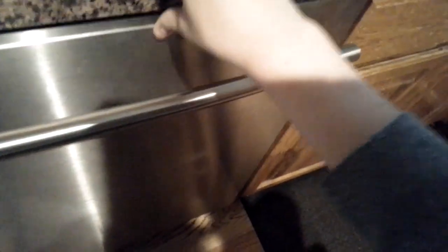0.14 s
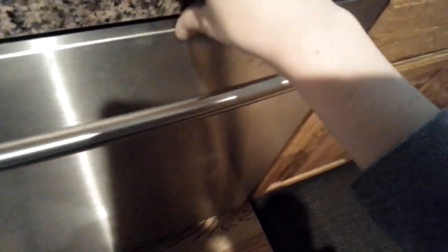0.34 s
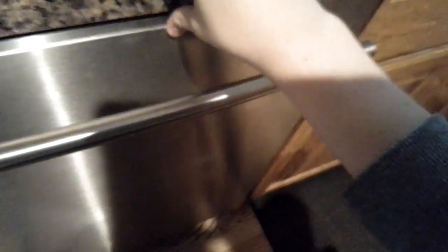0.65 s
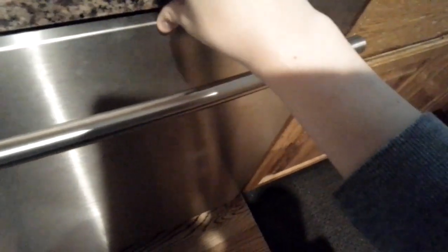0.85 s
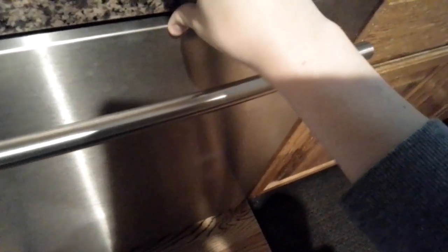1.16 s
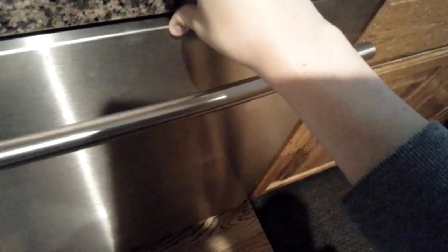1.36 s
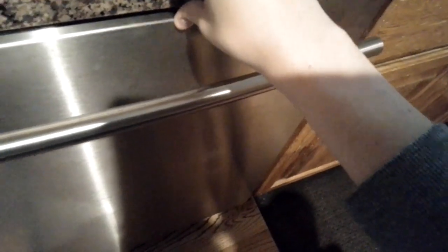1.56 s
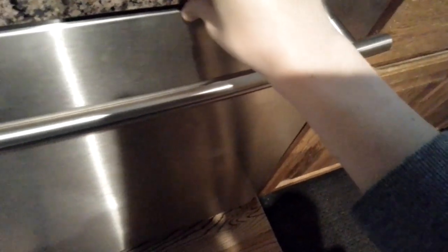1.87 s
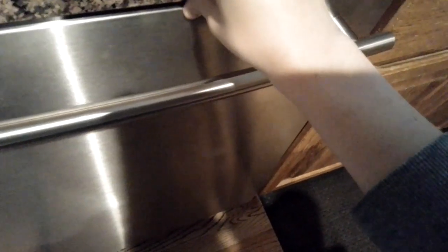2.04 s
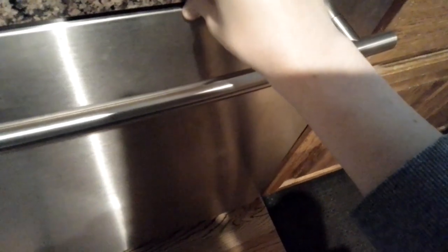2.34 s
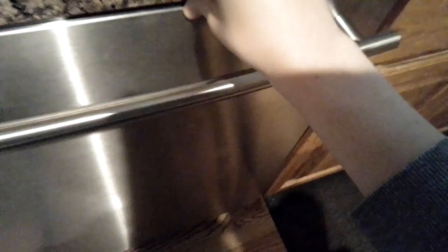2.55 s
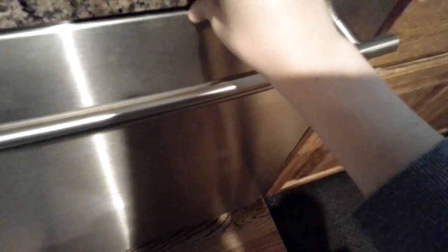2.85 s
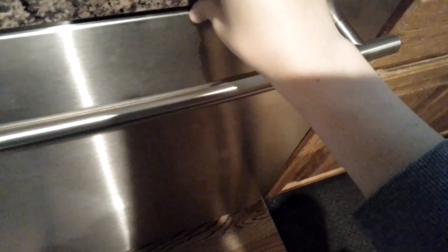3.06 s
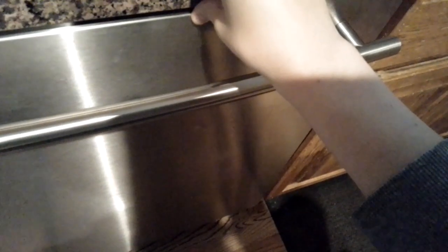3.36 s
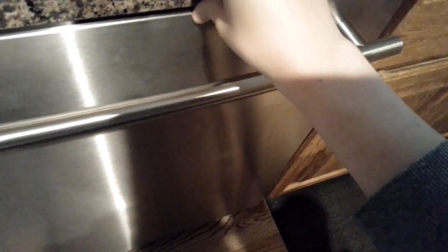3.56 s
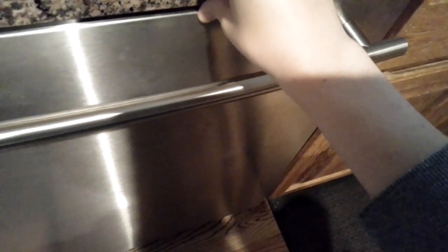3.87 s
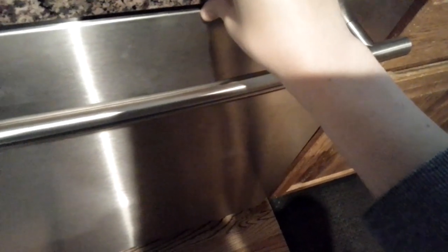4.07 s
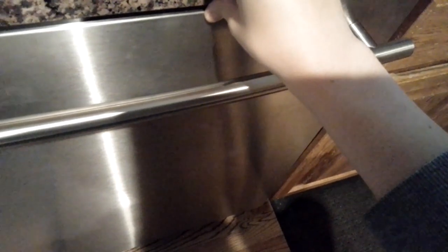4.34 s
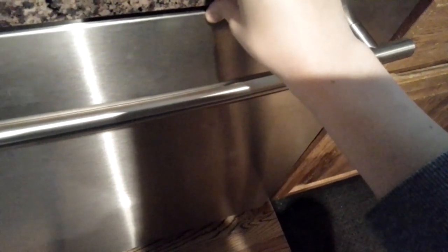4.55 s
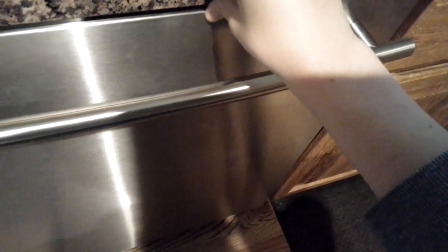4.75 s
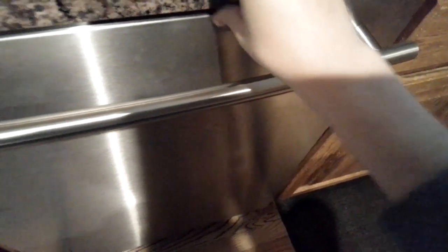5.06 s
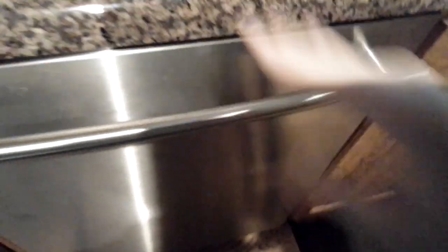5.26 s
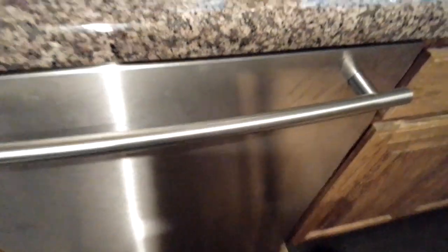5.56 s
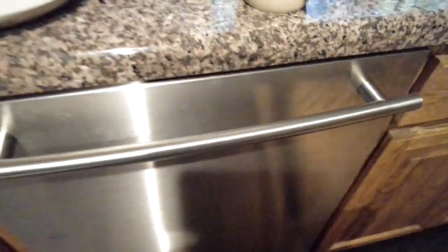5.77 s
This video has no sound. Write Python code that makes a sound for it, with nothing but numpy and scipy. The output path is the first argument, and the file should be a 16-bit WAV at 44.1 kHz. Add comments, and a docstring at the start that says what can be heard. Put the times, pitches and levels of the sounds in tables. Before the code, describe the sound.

Soft cloth rustles and dull door bumps, a loud latch thud with rattling racks, then a switch click, pump hum and splashing water inside a dishwasher.

```python
"""In a small kitchen, cloth brushes a steel dishwasher door and fingers tap it; it bumps softly on its gasket.
The latch snaps in and sets steel panel tones ringing, the cabinet booms in low tones and the racks rattle.
A switch clicks, then a relay starts the wash pump: rotor harmonics beat against the mains hum.
Water drums and splashes inside as shaped noise, ringing patter, bubbles and short slaps."""
import sys
import numpy as np
from scipy import signal
from scipy.fft import rfft, irfft, next_fast_len
from scipy.io import wavfile

SR = 44100
rng = np.random.default_rng(int(sys.argv[2]) if len(sys.argv) > 2 else 0)


def inscribe(sig):
    """Save sig as 16-bit PCM at rate SR to the path in sys.argv[1].

    A 1-D sig is mono; a 2-D sig holds one channel per row.
    Samples are clipped to [-1, 1] before scaling.
    """
    pcm = np.round(np.clip(np.atleast_2d(sig).T, -1, 1) * 32767)
    wavfile.write(sys.argv[1], SR, pcm.astype(np.int16))


N = 260631
TIME = np.arange(N) / SR   # seconds
AGE = TIME[:SR * 3 // 2]   # seconds since a blow

# Levels in the tables are relative: the functions below may scale them as a group.
# T60 is the time a sound takes to fall by 60 dB.

# The quiet of the room. Each row: frequency in Hz, density in dB per Hz.
ROOM_TONE = [(20, -8.5), (32, 5), (58, 4.5), (80, -1), (112, 6), (145, -8.5), (215, -1.5), (300, -10),
             (415, -6), (520, -14), (1000, -18), (2400, -22), (5800, -35.5), (7600, -47), (9500, -43.5),
             (11500, -57)]
# Echo of the kitchen. Each row: frequency in Hz, T60 in seconds.
KITCHEN_T60 = [(60, 0.24), (200, 0.93), (700, 0.51), (2000, 0.49), (5000, 0.53), (10000, 0.15)]
# How alike left and right are. Each row: frequency in Hz, likeness from -1 to 1.
LIKENESS = [(60, .95), (250, .98), (500, .92), (1000, .15), (2000, -.15), (4500, .2), (10000, -.4)]
# How the two microphone ports differ. Each row: frequency in Hz, left minus right in dB.
MIC_BALANCE = [(60, 0.07), (500, -2.5), (2000, -1.43), (3500, -2.5), (5500, -4.5), (7200, 4), (10000, 0.5)]
MIC_LOW_CUT_HZ, CUTOFF_HZ = 24, 10600

# Cloth brushes the door. Each row: start in seconds, length in seconds, level in dB.
BRUSHES = [(0.0, 0.16, -63), (0.13, 0.14, -63.5), (0.267, 0.096, -62), (0.328, 0.14, -66.5),
           (0.562, 0.24, -67)]
# Colour of the cloth. Each row: frequency in Hz, density in dB per Hz.
SLEEVE_COLOUR = [(150, 19), (400, 17.5), (1000, 11), (2500, 6.5), (4500, -2.5), (6500, -3), (8000, -16),
                 (9600, -5), (11000, -32)]
# The palm skids on steel. Each row: start in seconds, length in seconds, level in dB, pitch in Hz, width in Hz.
SCRAPES = [(0.0, 0.052, -73, 4200, 900), (0.16, 0.06, -82, 9400, 1300), (0.22, 0.077, -71, 4740, 1500),
           (0.273, .013, -72, 5400, 2800), (0.36, 0.06, -72.5, 3350, 700), (5.155, 0.0054, -59, 6940, 4000),
           (5.169, 0.0056, -60, 7000, 4000)]

# Fingers tap the door edge. Each row: start in seconds, level in dB.
TAPS = [(0.157, -3.5), (0.19, -12), (0.212, -9), (0.293, -2.5), (0.717, 6.5), (3.774, 0)]
# Tones of a tap. Each row: frequency in Hz, level in dB, T60 in seconds.
TAP_MODES = [(208.3, -42.5, 0.02), (470, -46, 0.015)]
# The held door creaks in faint slips. Each row: start in seconds, level in dB.
SLIPS = [(2.419, -62), (2.455, -68), (2.519, -60), (2.553, -63), (2.586, -70)]
SLIP_S = 0.015   # length of one slip
# Colour of the creak. Each row: frequency in Hz, density in dB per Hz.
CREAK_COLOUR = [(800, -20), (1800, -2.5), (2300, 2), (2900, -17), (5000, -19), (6200, -16), (7200, -27),
                (11000, -36)]

# The door meets its rubber gasket. Each row: start in seconds, level in dB.
BUMPS = [(0.295, -23.5), (0.706, -11), (0.881, -19), (1.139, -4.5), (1.4625, -1), (1.549, -11)]
# The door bounces on the rubber. Each row: frequency in Hz, level in dB, T60 in seconds.
GASKET_MODES = [(178, -22, .06), (206, -16.5, .075), (245, -22, .055), (300, -26, .05)]
# Colour of the dull knock. Each row: frequency in Hz, density in dB per Hz.
BUMP_KNOCK = [(70, -1.5), (110, 0), (200, 1), (330, -7.5), (460, -0.5), (580, -11.5), (750, -7.5),
              (950, -20), (1150, -12), (2500, -20)]
GASKET_SWELL_S = 0.0096   # the springy seal lets each bump swell

# Door contacts: the latch catches twice, then the door rebounds. Each row: start in seconds, level in dB,
# contact brightness (treble limit) in Hz.
DOOR_BLOWS = [(1.6316, 2, 9100), (1.6366, -15.5, 6870), (1.822, -13.5, 1250)]
# Tones of the door panel. Each row: frequency in Hz, level in dB, T60 in seconds.
DOOR_MODES = [(251, -31, .3), (318, -31, .25), (415, -34, .55), (456, -39, .3), (666, -28, .42),
              (705, -30, .2), (770, -29, .28), (812, -31, .33), (991, -35, .3), (1105, -28, .2),
              (1180, -25.5, .24), (1386, -30, .25), (1529, -32, .28), (1641, -30, .26), (1878, -29, .28),
              (2013, -29, .26), (2148, -29, .2), (2207, -29, .22), (2325, -30, .25), (2650, -33, .2),
              (3036, -33, .27), (4229, -35.5, .28), (4470, -36, .2), (4990, -39, .2)]
# Colour of the latch crack. Each row: frequency in Hz, density in dB per Hz.
DOOR_CRACK = [(70, -23), (140, -18), (290, -6), (380, -14), (500, -8), (700, 1.5), (920, -6), (1200, 0.5),
              (1500, -2), (2200, -2.5), (2800, -10), (3300, -16), (4600, -16), (6000, -22.5), (7200, -28),
              (10000, -27), (14000, -49)]

# The door's weight lands on the tub. Each row: start in seconds, level in dB.
THUDS = [(1.633, 0), (1.821, -12)]
# Tones of the tub. Each row: frequency in Hz, level in dB, T60 in seconds.
TUB_MODES = [(62, -35.5, 1.4), (110, -23, .22), (196, -10.3, 0.25), (279, -19, .17)]
# Colour of the boom. Each row: frequency in Hz, density in dB per Hz.
BOOM_COLOUR = [(25, -7), (45, 0), (100, 0.5), (220, 0), (330, -6.5), (500, -21.5), (1500, -60)]
BOOM_SWELL_S = 0.012
# The machine lurches on its feet. Each row: start in seconds, length in seconds, level in dB, pitch in Hz.
LURCHES = [(1.644, 0.054, -24, 48), (1.693, .06, -22.5, 65), (1.823, .07, -34.5, 72), (1.915, .06, -43, 70)]

# The racks crash when the latch catches, then chatter on until they settle.
RACKS_S, RACKS_ATTACK_S = 1.636, 0.009
CRASH_DB, CRASH_T60_S = -21, 0.055
CHATTER_DB, CHATTER_HOLD_S, CHATTER_T60_S = -39.5, 0.07, 0.38
RATTLES_PER_S, RATTLE_SPREAD_DB = 260, 3.5
# Racks knock against the tub. Each row: start in seconds, level in dB.
RACK_KNOCKS = [(1.6485, -18.5), (1.661, -26.5), (1.6877, -29.5), (1.703, -32.5), (1.722, -32), (1.745, -34),
               (1.78, -31)]
# Colour of the racks. Each row: frequency in Hz, density in dB per Hz.
RACK_COLOUR = [(200, -10), (420, -4), (700, -1), (1300, 0.5), (2700, 0.5), (3400, -7), (5800, -14),
               (7200, -32), (11000, -42)]
# Dishes and loose things, jolted by the door or hit by a jet, ring once.
# Each row: start in seconds, level in dB, pitch in Hz, width in Hz, T60 in seconds.
PINGS = [(1.78, -45, 5600, 850, .11), (2.119, -54, 1140, 240, .22), (5.061, -43.5, 3480, 300, .11),
         (5.061, -53, 5500, 500, .1), (5.385, -50, 3900, 300, .08), (5.628, -47, 3900, 300, .09),
         (5.628, -49, 5600, 500, .15)]
PING_ATTACK_S = 0.0016

# Clicks of the control switch. Each row: start in seconds, level in dB.
SWITCH = [(3.172, -46.5), (3.1755, -37), (3.180, -50), (3.186, -49), (3.205, -44.5)]
# Tones of the switch in the door. Each row: frequency in Hz, level in dB, T60 in seconds.
SWITCH_MODES = [(292, -12, .13), (315, -11, .18), (1150, -14, .035), (1682, -22, .2), (1997, -23, .22),
                (3278, -29, .2), (4355, -27, .22), (5421, -28, .2)]
# Colour of the switch. Each row: frequency in Hz, density in dB per Hz.
SWITCH_COLOUR = [(35, -10), (90, 7), (190, -5), (300, -4.5), (420, -4), (660, -2.5), (880, -13),
                 (1150, -3.5), (1400, -3), (2000, -2), (2600, -11.5), (3300, -8), (4300, -9), (4900, -13),
                 (5800, -12), (7400, -34), (10000, -31), (12000, -55)]
# Contacts of the pump relay. Each row: start in seconds, level in dB.
RELAY = [(4.5345, 0.5), (4.5405, -18)]
# Tones of the relay housing. Each row: frequency in Hz, level in dB, T60 in seconds.
RELAY_MODES = [(850, -28.5, 0.021), (1012, -23, 0.02), (1284, -37, 0.028), (2200, -44.5, 0.034)]
# Colour of the relay snap. Each row: frequency in Hz, density in dB per Hz.
RELAY_SNAP = [(200, -6), (550, -7), (800, 8), (1200, 6), (1600, 3), (2200, 7), (3000, -7.5), (5000, -4.5),
              (6500, 2.5), (7600, -14), (9800, -8), (11000, -52)]
RELAY_SWELL_S = 0.0019   # the housing takes a moment to ring up

# The rotor gathers speed and the hum grows with it.
PUMP_START_S, SPIN_UP_S, START_SLIP_HZ = 4.535, 0.0987, 14.25
MAINS_HZ, ROTOR_HZ = 60, 56.42   # rotor speed once it has spun up, before the wobble
THROB_S = 4.982   # a moment when rotor and mains swell together
# Mains hum. Each row: multiple of the mains frequency, level in dB.
MAINS_LINES = [(2, -46), (8, -58.5), (14, -63.5)]
# Rotor and vane hum. Each row: multiple of the rotor speed, level in dB.
ROTOR_LINES = [(2, -42.5), (6, -50), (7, -44.5), (8, -50), (9, -59), (12, -47)]
MOTOR_DB, MOTOR_RISE_S = 3.5, 0.22
ROTOR_DB, ROTOR_RISE_S, ROTOR_WAVER_DB = -3, 0.27, 2
WOBBLE_TURNS, WOBBLES_PER_S = 0.005, 12   # the uneven load shakes the rotor's speed
STRAIN_S, STRAIN_LENGTH_S, STRAIN_DB = 4.72, 0.18, 4.5   # the vanes sing out as they first bite the water
# The motor grinds into motion.
GROWL_DB, GROWL_HZ, GROWL_WIDTH_HZ, GROWL_T60_S = -52, 330, 200, 0.35
# The impeller gulps air. Each row: start in seconds, level in dB, T60 in seconds.
GULPS = [(4.625, -48, 0.15), (4.667, -41, 0.64)]
GULP_ATTACK_S, CHURN_DB = 0.0053, -55.5   # churning goes on once it is primed

# Water first churns in the sump and drums on the tub; the spray follows once the arms have filled.
WATER_START_S, PRESSURE_RISE_S = 4.59, 0.22
SPRAY_START_S, SPRAY_RISE_S = 4.61, 0.12
DRUMMING_DB, DRUMMING_GROWTH_DB_PER_S = -46, 4.5
SPRAY_DB, SPRAY_GROWTH_DB_PER_S = -50, 2.5
SLOSH_DB = 2.8   # how unevenly the water sloshes
# Colour of water drumming on the tub. Each row: frequency in Hz, density in dB per Hz.
DRUMMING = [(25, -4), (45, -8), (65, 14.5), (77, 5), (92, 8.5), (140, -1), (200, 5.5), (255, 2.5),
            (315, 3.5), (440, -2), (580, -3), (710, -9), (830, -19), (2000, -46.5)]
# Colour of the spray. Each row: frequency in Hz, density in dB per Hz.
HISS = [(450, -24.5), (750, -12.5), (1050, -1.5), (1500, -9.5), (1900, -8), (2300, -7), (2800, -13),
        (3500, -15.5), (4500, -19.5), (5700, -21.5), (7000, -30.5), (8000, -39), (9600, -36), (11000, -71)]
GURGLES_DB = -5.5   # air pockets against the spray
GURGLES_PER_S, GURGLE_SPREAD_DB = 70, 18
GURGLE_LOW_HZ, GURGLE_HIGH_HZ = 659, 2258   # range of starting pitches
GURGLE_CYCLES, GURGLE_RISE = 55, 0.12   # cycles at starting pitch to lose 60 dB; steepness of the upward glide
# Jets slap the door and dishes; the first two rows are spurts as the priming pump gulps air. Each row: start in
# seconds, level in dB, brightness (treble limit) in Hz.
SPLASHES = [(4.626, -38, 1300), (4.68, -37.5, 1710), (4.745, -35.5, 1500), (5.004, -49, 6000),
            (5.059, -30, 8740), (5.156, -40.5, 12000), (5.185, -35, 1400), (5.351, -39, 2000),
            (5.384, -34, 4950), (5.6275, -31, 9000), (5.777, -33, 1492), (5.838, -31.5, 1310),
            (5.885, -35.5, 4970)]
# Colour of a slap. Each row: frequency in Hz, density in dB per Hz.
SPLASH_COLOUR = [(300, 12.5), (1100, 13), (1900, 12.5), (2700, 0), (3500, 9), (4400, 2.5), (5700, 2),
                 (7000, -15.5), (10000, -15), (11500, -41)]
SLAP_ATTACK_S, SLAP_T60_S, SLAP_ROUGH_DB = 0.0018, 0.067, 1   # a jet crossing the door


def from_db(db):
    """Turn decibels into gain."""
    return 10 ** (np.asarray(db) / 20)


def rms_one(x):
    """Scale to an rms (average strength) of 1."""
    return x / np.sqrt(np.mean(x ** 2) + 1e-20)


def at_hz(points, hz):
    """Read a table between its rows on a log-frequency axis."""
    table = np.array(points)
    return np.interp(np.log(hz), np.log(table[:, 0]), table[:, 1])


def pan(x, left_db):
    """Lean a sound to the left by so many dB; negative leans right."""
    return x * from_db([[left_db / 2], [-left_db / 2]])


def drift(rate, size=N):
    """Wander around 0 with a spread of about 1, heading for a new random value `rate` times a second."""
    knots = rng.standard_normal(1024)
    return np.interp(TIME[:size] * rate, np.arange(len(knots)), knots)


def rise(start_s, rise_s):
    """Grow smoothly from silence to full strength."""
    return np.sin(np.pi / 2 * np.clip((TIME - start_s) / rise_s, 0, 1)) ** 2


def dying(t60):
    """Fade by 60 dB every t60 seconds."""
    return np.exp(-np.log(1000) * AGE / t60)


def burst(start_s, attack_s, t60, hold_s=0):
    """Attack, hold, then release exponentially."""
    release_s = np.maximum(TIME - start_s - attack_s - hold_s, 0)
    return rise(start_s, attack_s) * np.exp(-np.log(1000) * release_s / t60)


def stroke(start_s, length_s):
    """Make one movement that swells and fades."""
    return np.sin(np.pi * np.clip((TIME - start_s) / length_s, 0, 1))


def coloured(x, spectrum, power=1):
    """Shape a signal by a table of Hz and dB, with the gain raised to a power."""
    size = next_fast_len(x.shape[-1] + 4096)
    hz = np.maximum(np.arange(size // 2 + 1) * SR / size, 1)
    shaped = rfft(x, size) * from_db(power * at_hz(spectrum, hz))
    return irfft(shaped, size)[..., :x.shape[-1]]


def bands(size, focus=1):
    """Give stereo noise band by band; LIKENESS times focus sets how alike the two sides are."""
    edges = np.geomspace(20, 15000, 21)
    white = rng.standard_normal((2, 2, size + 8192))   # neighbouring bands use separate noise
    for k, (low, high) in enumerate(zip(edges, edges[1:])):
        band_filter = signal.butter(2, [low, high], "band", fs=SR, output="sos")
        mid, side = signal.sosfilt(band_filter, white[k % 2])[:, -size:]   # skip the filter's start-up
        hz = np.sqrt(low * high)
        alike = np.clip(focus * at_hz(LIKENESS, hz), -1, 1)
        yield hz, np.sqrt(1 + alike) * mid + np.sqrt(1 - alike) * side * [[1], [-1]]


def noise(spectrum, patchy_db=0, size=N, focus=1):
    """Make coloured stereo noise of rms 1 whose bands flicker separately by patchy_db."""
    flickering = sum(band * from_db(patchy_db * drift(25, size)) for hz, band in bands(size, focus))
    return rms_one(coloured(flickering, spectrum))


def resonant_noise(hz, width_hz, size=N):
    """Pass stereo noise twice through one resonance; rms 1."""
    b, a = signal.iirpeak(hz, hz / width_hz, fs=SR)
    hiss = rng.standard_normal(size) + rng.standard_normal((2, size))   # shared part plus separate sides
    once = signal.lfilter(b, a, hiss)
    return rms_one(signal.lfilter(b, a, once))


def crack(spectrum, t60):
    """Use fading noise for the crowd of short-lived tones that a contact wakes."""
    return noise(spectrum, size=len(AGE)) * dying(t60)


def ringing(modes):
    """Add up clear fading tones; where LIKENESS is lower, the two sides are further out of step."""
    out = 0
    for hz, db, t60 in modes:
        lag = np.arccos(np.clip(at_hz(LIKENESS, hz), -1, 1))
        phase = np.maximum(2 * np.pi * hz * AGE - [[lag], [0]], 0)
        out = out + from_db(db) * dying(t60) * np.sin(phase)
    return out


def clicks(rows):
    """Place one impulse for each row of seconds and dB."""
    out = np.zeros(N)
    for s, db in rows:
        out[round(s * SR)] += from_db(db)
    return out


def grains(per_s, spread_db):
    """Scatter impulses at random moments, of uneven size and sign."""
    sizes = from_db(spread_db * np.minimum(rng.exponential(1, N), 4)) * rng.choice([-1, 1], N)
    return sizes * (rng.random(N) < per_s / SR)


def softened(force, hz):
    """Soften a contact: its force spreads in time and loses its treble."""
    low_pass = signal.butter(2, min(hz, .45 * SR), fs=SR, output="sos")
    return signal.sosfilt(low_pass, force + 1e-18)


def through(force, response):
    """Play a force through a stereo response."""
    return signal.fftconvolve(np.atleast_2d(force), response, axes=1)[:, :N]


def kitchen(x, wet_db):
    """Add the diffuse tail of hard walls and cupboards: quick to build up, its fading set by KITCHEN_T60."""
    tail = sum(band * dying(at_hz(KITCHEN_T60, hz)) for hz, band in bands(len(AGE)))
    tail = tail * (1 - np.exp(-AGE / 0.0009))
    return x + from_db(wet_db) * through(x, rms_one(tail) / np.sqrt(len(AGE)))


def room_tone():
    """Hold an even, coloured noise for the quiet of the room."""
    return from_db(-57.5) * pan(noise(ROOM_TONE, focus=0.1), left_db=1.5)


def sleeve():
    """Brush cloth softly as the arm settles, and skid the palm on steel in short, thin scrapes."""
    brushing = sum(from_db(db) * stroke(s, length) for s, length, db in BRUSHES)
    cloth = noise(SLEEVE_COLOUR, patchy_db=2.5)
    scrapes = sum(from_db(db) * stroke(s, length) * resonant_noise(hz, width)
                  for s, length, db, hz, width in SCRAPES)
    return (brushing * cloth + scrapes) * from_db(2.4 * drift(88.6))


def finger():
    """Creak the door in faint, rough slips under the pressing hand; soft fingertip taps ring briefly."""
    slips = sum(from_db(db) * stroke(s, SLIP_S) for s, db in SLIPS)
    taps = through(softened(clicks(TAPS), hz=904), ringing(TAP_MODES))
    return slips * noise(CREAK_COLOUR) + taps


def gasket():
    """Nudge the door against its seal: a dull knock and a short, rubbery bounce."""
    nudges = clicks(BUMPS)
    rubber = signal.butter(2, [140, 340], "band", fs=SR, output="sos")
    springy = ringing(GASKET_MODES) * (1 - np.exp(-AGE / GASKET_SWELL_S))
    bounce = through(signal.sosfilt(rubber, nudges + 1e-18), springy)
    knock = through(softened(nudges, hz=1300), crack(BUMP_KNOCK, t60=.13))
    return kitchen(from_db(-1.0) * bounce + from_db(-43.5) * knock, wet_db=-15)


def door():
    """Snap the latch in and let the door rebound: each contact wakes every tone of the steel panel and a short
    crack."""
    panel = from_db(-8.0) * (ringing(DOOR_MODES) + crack(DOOR_CRACK, t60=0.063))
    force = sum(softened(clicks([(s, db)]), hz) for s, db, hz in DOOR_BLOWS)
    return through(force, panel)


def cabinet():
    """Boom the tub under the door's weight; the whole machine lurches and shakes the floor in low tones."""
    swell = np.minimum(AGE / BOOM_SWELL_S, 1) ** 2
    boom = swell * (ringing(TUB_MODES) + from_db(-27.5) * crack(BOOM_COLOUR, t60=0.52))
    lurches = sum(from_db(db) * stroke(s, length) * np.sin(2 * np.pi * hz * (TIME - s))
                  for s, length, db, hz in LURCHES)
    return through(clicks(THUDS), boom) + lurches


def racks():
    """Chatter the shaken racks with random tiny hits, knock them on the tub, and ring a few dishes."""
    crash = from_db(CRASH_DB) * burst(RACKS_S, RACKS_ATTACK_S, CRASH_T60_S)
    settling = from_db(CHATTER_DB) * burst(RACKS_S, RACKS_ATTACK_S, CHATTER_T60_S, CHATTER_HOLD_S)
    hits = through(grains(RATTLES_PER_S, RATTLE_SPREAD_DB), crack(RACK_COLOUR, t60=0.0074))
    chatter = (crash + settling) * rms_one(hits)
    knocks = through(clicks(RACK_KNOCKS), crack(RACK_COLOUR, t60=0.05))
    pings = sum(from_db(db) * burst(s, PING_ATTACK_S, t60) * resonant_noise(hz, width)
                for s, db, hz, width, t60 in PINGS)
    return chatter + knocks + pings


def control_switch():
    """Clack the switch in the door: ringing tones with a short crack and a longer, fainter one."""
    short_crack = from_db(1.5) * crack(SWITCH_COLOUR, t60=0.037)
    long_crack = from_db(-9.0) * crack(SWITCH_COLOUR, t60=0.26)
    switch = through(clicks(SWITCH), ringing(SWITCH_MODES) + short_crack + long_crack)
    return kitchen(pan(switch, left_db=-0.5), wet_db=-14.5)


def pump_relay():
    """Snap the relay shut with a short, hollow ring of its housing."""
    housing = ringing(RELAY_MODES) * (1 - np.exp(-AGE / RELAY_SWELL_S))
    relay = through(clicks(RELAY), housing + from_db(-48) * crack(RELAY_SNAP, t60=0.064))
    return kitchen(pan(relay, left_db=-1.0), wet_db=-14.5)


def hum(turns, lines, waver_db=0):
    """Add the harmonics of a turning or buzzing part, each wavering in strength by waver_db."""
    return sum(from_db(db + waver_db * drift(14)) * np.cos(round(k) * 2 * np.pi * turns) for k, db in lines)


def pump():
    """Run the rotor slower than the mains, so their second harmonics throb; air gulps give way to churning."""
    motor_hum = hum(MAINS_HZ * (TIME - THROB_S), MAINS_LINES)
    motor = from_db(MOTOR_DB) * rise(PUMP_START_S, MOTOR_RISE_S) * motor_hum

    # This shrinking phase offset makes the rotor start slow and catch up.
    run_up = START_SLIP_HZ * SPIN_UP_S * np.exp(-np.maximum(TIME - PUMP_START_S, 0) / SPIN_UP_S)
    turns = ROTOR_HZ * (TIME - THROB_S) + run_up + WOBBLE_TURNS * drift(WOBBLES_PER_S)
    strain = from_db(STRAIN_DB * stroke(STRAIN_S, STRAIN_LENGTH_S))
    vanes = strain * hum(turns, ROTOR_LINES[1:], ROTOR_WAVER_DB)
    second_harmonic = hum(turns, ROTOR_LINES[:1])
    rotor = from_db(ROTOR_DB) * rise(PUMP_START_S, ROTOR_RISE_S) ** 2 * (second_harmonic + vanes)

    growl = burst(PUMP_START_S, 0.015, GROWL_T60_S) * resonant_noise(GROWL_HZ, GROWL_WIDTH_HZ)
    gulps = sum(from_db(db) * burst(s, GULP_ATTACK_S, t60) for s, db, t60 in GULPS)
    churn = from_db(CHURN_DB) * rise(WATER_START_S, PRESSURE_RISE_S)
    impeller = resonant_noise(690, 110) * from_db(1.5 * drift(40))
    sump = resonant_noise(328, 150) * from_db(2.0 * drift(40))
    gurgling = (gulps + churn) * (from_db(0.5) * impeller + from_db(-2.0) * sump)
    return motor + rotor + from_db(GROWL_DB) * growl + gurgling


def gurgles():
    """Collapse larger air pockets one by one; each rings briefly and rises in pitch as it nears the surface."""
    out = np.zeros((2, N + len(AGE)))
    age = AGE[:SR // 8]
    for when, pitch, size, side in rng.random((round(GURGLES_PER_S * N / SR), 4)):
        hz = GURGLE_LOW_HZ * (GURGLE_HIGH_HZ / GURGLE_LOW_HZ) ** pitch
        life = age / (GURGLE_CYCLES / hz)
        cycles = hz * age * (1 + GURGLE_RISE * np.minimum(life, 1))
        ring = np.sin(2 * np.pi * cycles) * from_db(-60 * life) * (1 - np.exp(-age * hz))
        start = int(when * N)
        bubble = pan(ring * from_db(-GURGLE_SPREAD_DB * size), left_db=20 * (side - 1.0))
        out[:, start:start + len(age)] += bubble
    return rms_one(kitchen(out[:, :N], wet_db=4.5))


def slaps():
    """Sweep a jet across the door and dishes, or spurt water as the pump gulps air: each slap is a short, rough
    rush of noise."""
    size = SR // 4
    out = np.zeros((2, N + size))
    sweep = (1 - np.exp(-AGE / SLAP_ATTACK_S)) * dying(SLAP_T60_S)
    for s, db, hz in SPLASHES:
        roughness = from_db(SLAP_ROUGH_DB * drift(300, size))
        rush = noise(SPLASH_COLOUR, size=size) * sweep[:size] * roughness
        start = round(s * SR)
        out[:, start:start + size] += from_db(db) * softened(rush, hz)
    return kitchen(out[:, :N], wet_db=-9.5)


def water():
    """Drum jets on the tub, patter them on the door panel, break them into drops and bubbles, and slap."""
    running_s = TIME - WATER_START_S
    pressure = rise(WATER_START_S, PRESSURE_RISE_S)
    drumming = np.sqrt(pressure) * from_db(DRUMMING_DB + DRUMMING_GROWTH_DB_PER_S * running_s)
    hiss = rise(SPRAY_START_S, SPRAY_RISE_S) * from_db(SPRAY_DB + SPRAY_GROWTH_DB_PER_S * running_s)

    patter_force = softened(grains(per_s=65, spread_db=2.5), hz=875)
    patter = rms_one(through(patter_force, ringing(DOOR_MODES) + from_db(-8) * ringing(TUB_MODES)))
    tub = drumming * (noise(DRUMMING, patchy_db=SLOSH_DB, focus=0.76) + from_db(-6.0) * patter)

    drops = rms_one(through(grains(per_s=600, spread_db=2.0), crack(HISS, t60=0.024)))
    fine_spray = from_db(-0.64) * noise(HISS, patchy_db=SLOSH_DB)
    spray = hiss * (fine_spray + from_db(-7.5) * drops + from_db(GURGLES_DB) * gurgles())
    return pan(tub + spray + slaps(), left_db=-1.5)


def scene():
    """Mix hand, door, controls, pump and water over the even quiet of the room."""
    hand_and_door = kitchen(finger() + door() + racks(), wet_db=-11.5)
    body = kitchen(pan(cabinet(), left_db=-1.5), wet_db=-19)
    controls = control_switch() + pump_relay()
    return room_tone() + sleeve() + hand_and_door + gasket() + body + controls + pump() + water()


def record(dry):
    """Let two ports hear a little differently, cut the lowest rumble, clip at full scale and cut the top."""
    left = coloured(dry[0], MIC_BALANCE, 1 / 2)
    right = coloured(dry[1], MIC_BALANCE, -1 / 2)
    low_cut = signal.butter(2, MIC_LOW_CUT_HZ, "high", fs=SR, output="sos")
    ports = signal.sosfilt(low_cut, np.array([left, right]))
    top_cut = signal.ellip(8, .2, 70, CUTOFF_HZ, fs=SR, output="sos")
    return signal.sosfilt(top_cut, np.clip(ports, -1, 1))


dry = scene()
out = record(dry)
inscribe(out)
```